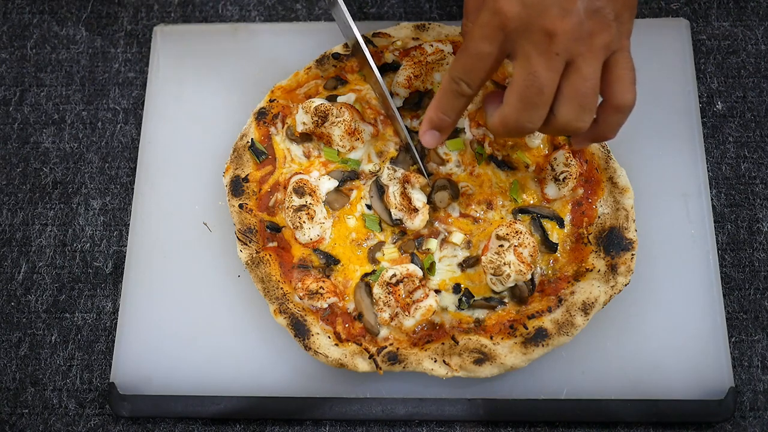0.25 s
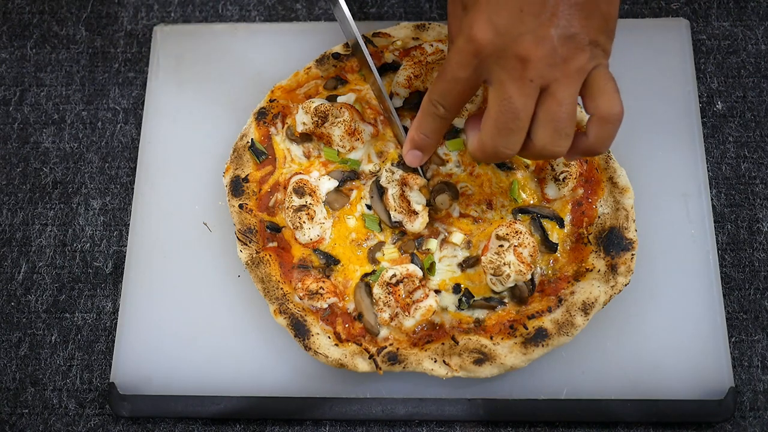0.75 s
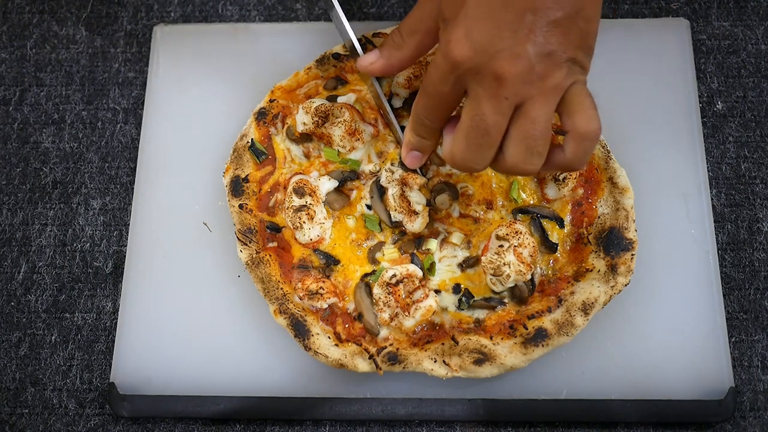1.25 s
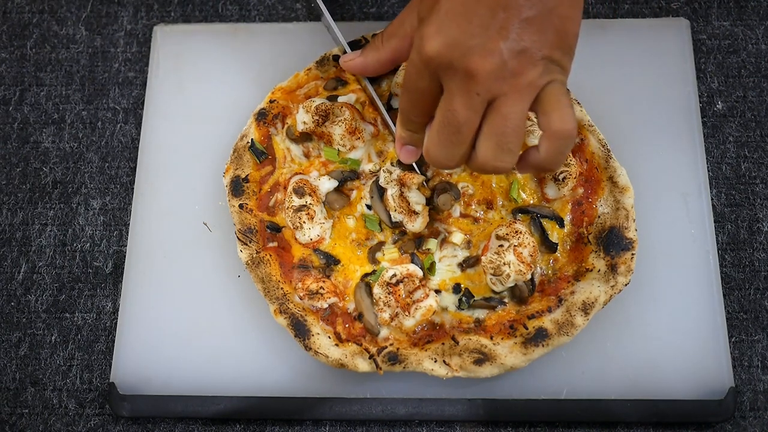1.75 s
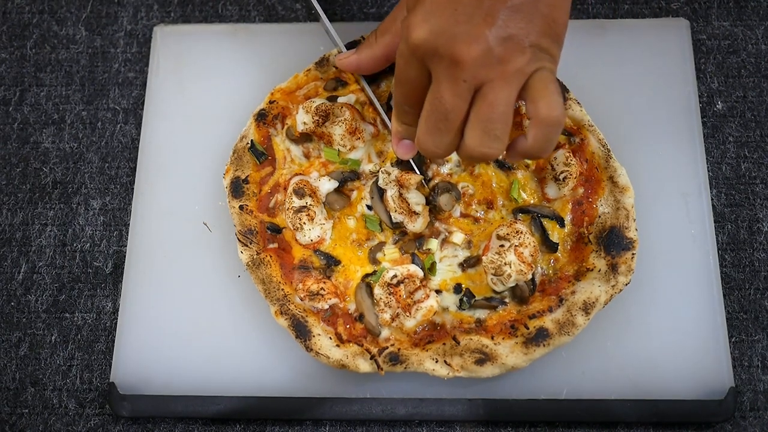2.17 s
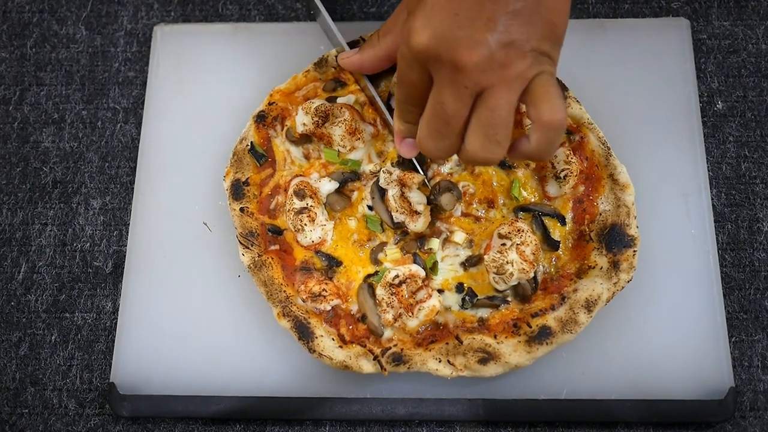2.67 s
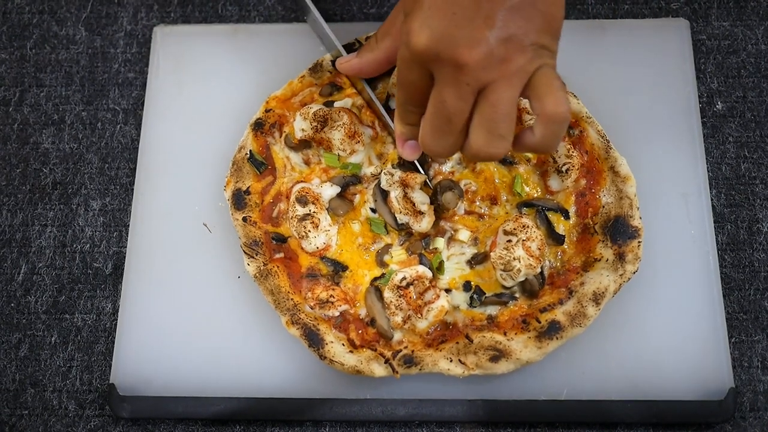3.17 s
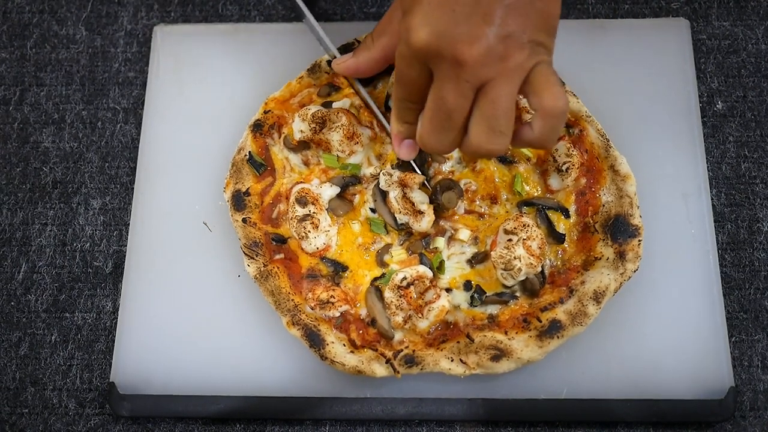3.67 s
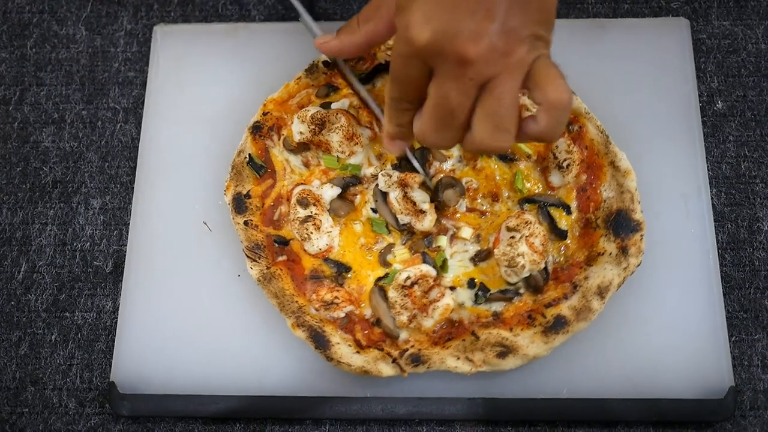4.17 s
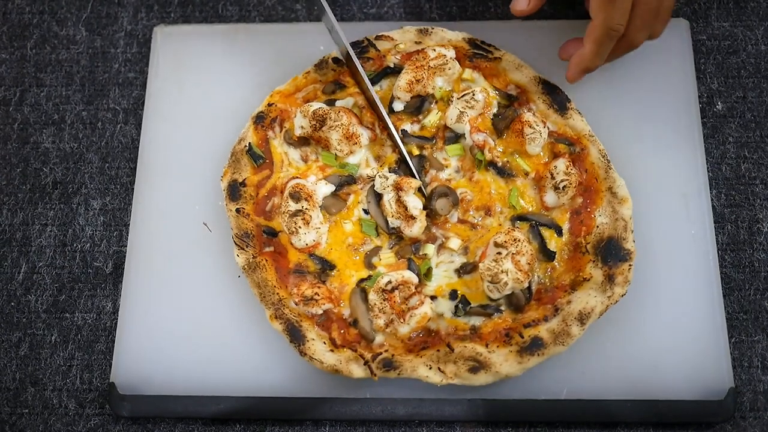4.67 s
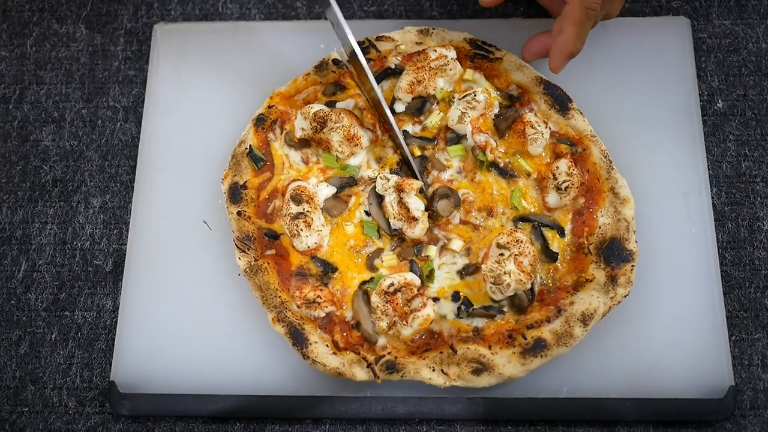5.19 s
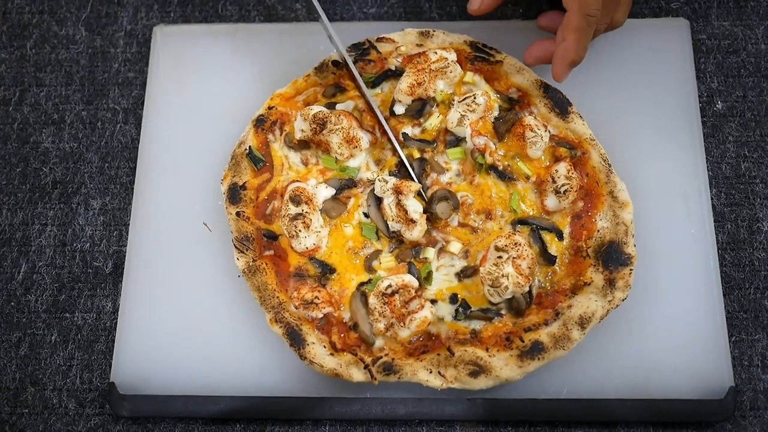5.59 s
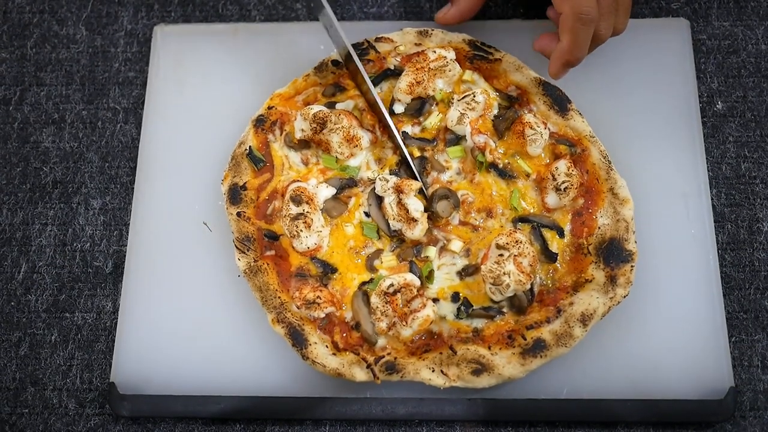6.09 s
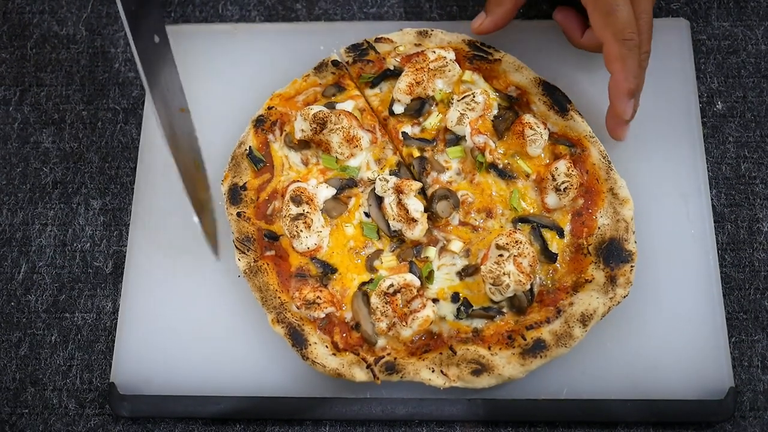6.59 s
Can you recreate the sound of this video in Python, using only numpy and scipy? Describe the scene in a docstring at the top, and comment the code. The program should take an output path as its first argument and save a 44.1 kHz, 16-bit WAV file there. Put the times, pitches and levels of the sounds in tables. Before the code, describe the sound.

A knife cuts through crisp pizza crust in irregular crunches and crackles, with a few knocks on a plastic cutting board.

```python
"""In a small, quiet kitchen, a knife saws through a crisp baked crust on a plastic board.
The crust breaks in sharp cracks over a dense crackle; each break is a brief, bright snap of crust with
a short thud of the board. The blade knocks on the bare board and is set down at the end with a faint
ting. The pushing hands shake the table, which rumbles up into a close stereo microphone."""
import sys
import numpy as np
from scipy import signal
from scipy.fft import rfft, irfft
from scipy.io import wavfile
from scipy.ndimage import uniform_filter1d

SR = 44100
rng = np.random.default_rng(int(sys.argv[2]) if len(sys.argv) > 2 else 0)


def log_audio(samples):
    """Write samples as a 16-bit WAV file to the path given in sys.argv[1]."""
    # one column per channel
    frames = np.atleast_2d(samples).T
    # limit to full scale, then quantise
    limited = np.clip(frames, -1, 1)
    pcm = np.round(limited * 32767).astype(np.int16)
    wavfile.write(sys.argv[1], SR, pcm)


N = 301775

# Room air, and the hiss that differs between left and right. Each row: frequency in Hz, relative dB.
AIR_COLOUR = [(15, 12.5), (45, -4.5), (60, 0), (170, -1.5), (300, -3.5), (1200, -11), (2200, -19),
              (4400, -19), (6000, -21.5), (11000, -23.5), (16000, -29.5)]
HISS_COLOUR = [(15, -20.5), (300, -20), (1000, -29.5), (5000, -30), (16000, -33.5)]

# A mode is a pitch at which a thing likes to ring. The table sways, rocks and drums in these modes.
# Each row: pitch in Hz, width in Hz, relative level in dB.
SWAY_MODES = [(17, 10, 0)]
ROCK_MODES = [(43, 11, 0), (53, 7, -16)]
DRUM_MODES = [(83, 12, -3), (96, 12, -7), (112, 14, -9), (180, 70, -11)]
# Hands shove the table. Each row: peak time and hold in seconds, then sway, rock and drum levels in dB.
HAND_SHOVES = [(0.87, 0.018, -56, -66, -76), (1.107, 0.07, -48.5, -51, -61),
               (1.31, 0.044, -46.5, -60, -58.5), (1.695, 0.36, -55, -61.5, -58),
               (2.008, 0.034, -41.5, -60, -51.5), (2.157, 0.041, -50.5, -65, -54),
               (2.415, 0.14, -43, -50, -60), (2.64, .01, -63, -65, -50.5), (2.75, 0.075, -42, -89, -59),
               (3.096, 0.22, -40.5, -40, -40.5), (3.562, 0.16, -38.5, -44.5, -44.5),
               (3.956, 0.078, -51, -46, -47.5), (4.126, 0.039, -30.5, -33, -41),
               (4.398, 0.13, -41, -35, -37), (4.618, 0.13, -40, -47, -42),
               (5.042, 0.049, -36.5, -41, -45.5), (5.243, 0.044, -35.5, -51, -54),
               (5.407, 0.028, -35.5, -44.5, -53.5), (5.5, 0.014, -40.5, -45.5, -42.5),
               (5.666, 0.015, -41.5, -41, -48), (5.913, 0.11, -38, -49.5, -53),
               (6.134, 0.081, -45.5, -58, -58), (6.745, .1, -54, -52, -45.5)]

# Modes of struck things. Each row: pitch in Hz, relative level in dB, seconds to fade by 60 dB.
BOARD_MODES = [(431, -16, .04), (625, -4, .048), (790, 0, .022), (960, -3, .026), (1130, -4, .022)]
CRUST_MODES = [(1250, 7, 0.0015), (2048, -4, 0.0075), (2640, 3.5, 0.0037), (3050, -1, 0.0028),
               (3390, -2.5, 0.0025)]
EDGE_MODES = [(4250, 0, .005), (4800, 0, .005), (5450, -2, .005), (6100, -9, .004), (7400, -16, .004)]  # the bright part of a break
SPLINTER_MODES = [(8650, 6, 0.0012), (10000, -5, 0.005), (11380, -7.5, 0.0025), (14220, -12, 0.0012)]  # the finest bits under the edge
STEEL_MODES = [(3930, 0, .05), (4050, -8, .03)]
THUMP_MODES = [(104.4, -3.5, 0.43), (158, -2.5, 0.13), (302, -4, 0.049)]  # low ring under the knife as it is set down

# The knife is set down, and its lifted blade touches the board. Each row: time in seconds, level in dB.
KNIFE_LANDINGS = [(6.711, -27.5), (6.823, -27.5)]
BLADE_TOUCHES = [(6.71, -42.5), (6.786, -55), (6.821, -49)]
# The blade hits the bare board. Each row: start in seconds, strength in dB, contact time in seconds.
BOARD_KNOCKS = [(3.2178, -12.5, 0.00078), (4.9995, 3, 0.00071), (6.818, -12, 0.00079)]
# Each bite of the blade is a burst of crackle. Each row: peak time and hold in seconds,
# rise and fade in dB per second, then crust, board and edge levels in dB.
BLADE_BITES = [(1.288, .012, 898, 185, -60.5, -55, -57.5), (1.724, .02, 400, 83, -57.5, -60, -56.5),
               (1.9, .02, 1200, 316, -54.5, -55.5, -52.5), (1.937, .015, 800, 222, -48, -48, -45),
               (2.101, .01, 1200, 174, -57, -57, -53), (2.429, .074, 496, 130, -52, -58, -53.5),
               (2.6, .01, 1200, 108, -54, -54, -54.5), (2.748, .07, 500, 192, -57, -55.5, -58.5),
               (2.923, .031, 600, 250, -58, -59, -63.5), (3.014, .03, 1200, 320, -44.5, -43.5, -47),
               (3.093, .044, 550, 300, -48.5, -66, -54.5), (3.156, .01, 1500, 350, -36.5, -36, -39.5),
               (3.236, .034, 550, 144, -42.5, -55, -45), (3.466, .015, 1500, 196, -41, -48, -46),
               (3.557, .025, 550, 270, -47.5, -54, -54), (3.641, .015, 1500, 155, -45.5, -59, -46),
               (3.768, 0.025, 300, 150, -58, -59.5, -60.5), (3.906, .08, 1800, 239, -50, -52, -54),
               (4.071, .024, 503, 302, -38.5, -42.5, -46), (4.135, 0.0091, 1200, 250, -56.5, -52.5, -52.5),
               (4.194, .03, 2000, 129, -41, -48, -50), (4.382, .025, 598, 258, -34.5, -37.5, -42.5),
               (4.471, .021, 450, 550, -33.5, -38, -42.5), (4.55, .023, 400, 507, -37.5, -42.5, -47),
               (4.61, .02, 900, 220, -38.5, -44, -46.5), (4.681, .04, 800, 102, -47, -46.5, -49.5),
               (4.909, .005, 1500, 110, -57, -73, -56), (4.995, .068, 1205, 102, -54, -51, -62),
               (5.105, .034, 548, 331.5, -49, -52, -59.5), (5.252, .03, 2000, 95, -47, -58, -48.5),
               (5.46, .006, 1502, 163, -64, -59, -56), (5.619, .0087, 598, 103, -54, -59, -61.5),
               (5.754, .039, 803, 152, -60, -63.5, -60.5), (6.109, .022, 1195, 302, -52, -56, -66),
               (6.163, 0.05, 549, 142.5, -63.5, -62.5, -70), (6.71, .0046, 1501.5, 42, -67, -60.5, -69),
               (6.816, .03, 548, 100, -55, -64, -70)]
# The blade resting in the crust creaks faintly. One long burst, with the same columns as a bite.
RESTING_CREAK = (0.5, 6, 302, 59.5, -70, -74, -76)
# Single sharp cracks. Each row: time in seconds, then crust, board and edge strengths in dB.
CRUST_CRACKS = [(0.7841, -41, -39, -62), (.899, -49, -54, -62), (1.1443, -24, -32, -30.5),
                (1.2014, -22.5, -34, -36.5), (1.28, -31, -44, -52), (1.293, -16, -26.5, -28.5),
                (1.3097, -28, -37, -34), (1.3204, -27.5, -61, -37), (1.3596, -32, -30, -45),
                (1.3636, -37, -50, -45), (1.4728, -49, -45.5, -46), (1.521, -48, -50, -46),
                (1.5575, -33, -37.5, -38), (1.6, -41, -42, -42), (1.638, -39, -35.5, -40),
                (1.6794, -36, -54, -40), (1.69, -38, -33, -52), (1.7249, -38, -39, -52),
                (1.737, -37, -44, -43), (1.7476, -35, -38, -53), (1.7592, -27, -38, -31),
                (1.779, -34, -53, -51), (1.824, -37, -43, -50), (1.876, -43, -45, -52),
                (1.888, -38, -39, -46), (1.9012, -24.5, -43, -35), (1.9211, -26, -34, -22),
                (1.9395, -19.5, -16.5, -25), (1.952, -30, -46, -43), (2.007, -26, -27.5, -53),
                (2.1026, -31, -38, -33), (2.1163, -23, -25, -27.5), (2.152, -28.5, -41, -36),
                (2.2759, -37, -41, -44.5), (2.3396, -35.5, -35, -40), (2.3832, -38, -49, -53),
                (2.431, -39, -36, -49), (2.4611, -19.5, -33, -39), (2.4932, -20.5, -32, -38),
                (2.5205, -30, -59, -49), (2.591, -27, -32, -42), (2.609, -36, -37, -43),
                (2.6402, -34, -40, -34), (2.671, -36, -35, -46), (2.7176, -54, -32, -65),
                (2.74, -48, -31.5, -55), (2.752, -37, -35, -43), (2.775, -31, -32.5, -46),
                (2.788, -38, -36, -48), (3.0208, -25, -38, -32), (3.03, -22.5, -32, -40),
                (3.036, -23, -29, -39), (3.043, -21, -25.5, -45), (3.0525, -22, -27, -45),
                (3.078, -27, -46, -44), (3.0933, -11, -21.5, -35), (3.105, -30, -34, -42),
                (3.117, -40, -29, -42), (3.1253, -29, -25, -40), (3.1322, -25, -26, -27),
                (3.1537, -23, -13.5, -27.5), (3.171, -23, -18, -26), (3.185, -24, -25, -26),
                (3.2183, -20, -14, -26), (3.2508, -21, -16.5, -24), (3.2595, -16.5, -14.5, -16),
                (3.2725, -31, -33, -28), (3.442, -38, -39, -58), (3.457, -38, -44, -47),
                (3.465, -14.5, -34, -26), (3.482, -28, -26, -39), (3.4947, -9.5, -21.5, -19),
                (3.5173, -24, -54, -29), (3.533, -28, -52, -37), (3.55, -29, -40, -44),
                (3.5609, -21, -60, -50), (3.589, -42, -36, -47), (3.656, -15.5, -19, -14),
                (4.1946, -27, -34, -32), (4.2614, -19.5, -25.5, -54), (4.34, -27.5, -35, -46),
                (4.3784, -17, -35, -43), (4.4089, -14, -22, -35), (4.5692, -20, -27, -45),
                (4.6766, -16.5, -23.5, -35), (4.7206, -18, -49, -44), (4.726, -20, -49, -43),
                (4.7314, -19, -37, -20), (4.738, -19, -34, -25), (4.75, -23, -26, -29),
                (4.7597, -9.5, -12, -14.5), (4.789, -27, -32, -36), (4.8012, -23, -35, -32),
                (4.884, -30, -40, -39), (4.9142, -10, -19, -17), (4.9995, -5, 0, -23),
                (5.135, -29, -60, -47), (5.2464, -8, -22.5, -11), (5.2675, -14, -22.5, -19),
                (5.299, -30, -27.5, -39), (5.3972, -33, -34.5, -44), (5.467, -29.5, -30, -35),
                (5.613, -30, -45, -40), (5.632, -27.5, -32, -68), (5.6583, -30, -59, -52),
                (5.724, -36, -60, -46), (5.806, -37.5, -58, -43.5), (5.864, -57, -35, -56.5),
                (5.967, -31, -74, -39), (6.47, -42, -40.5, -55.5), (6.71, -36, -26, -43)]

CRACK_SCATTER_DB, THUD_SCATTER_DB, CRUMB_SCATTER_DB = 2.8, 2.2, 5.5  # mode levels vary from hit to hit
DOUGH_DAMP, KNOCK_DAMP = .35, .68  # share of the board's ring time left under the dough, under the blade
PIECE_DETUNE = .1  # pitches spread because every piece of crust has its own size


def undb(db):
    """Turn decibels into a gain."""
    return 10 ** (np.asarray(db) / 20)


def unit(x):
    """Scale a signal to an average (rms) level of 1."""
    return x / np.sqrt(np.mean(x ** 2))


def wander(per_s):
    """A smooth random curve that heads for a new value per_s times a second."""
    step = int(SR / per_s)
    stairs = np.repeat(rng.standard_normal(N // step + 1), step)
    return uniform_filter1d(uniform_filter1d(stairs, step), step)[:N]


def bursts(peak_s, hold_s, rise, fade, db):
    """Total level in dB of bursts that rise, hold and fade; rise and fade are in dB per second."""
    t = np.arange(0, N / SR + .002, .001)[:, None]
    below_peak = rise * np.maximum(peak_s - t, 0) + fade * np.maximum(t - peak_s - np.abs(hold_s), 0)
    power = np.sum(undb(2 * np.maximum(db - below_peak, -150)), axis=1)
    return np.interp(np.arange(N) / SR, t[:, 0], 10 * np.log10(power))


def ring(force, hz, ring_s):
    """One mode rings and dies away; only its motion makes sound, so it is silent at rest."""
    turn = np.exp(2j * np.pi * hz / SR)
    pole = turn * np.exp(-np.log(1000) / (max(ring_s, 1e-3) * SR))
    motion = np.array([1, -1]) * pole.imag / abs(1 - turn)
    return signal.lfilter(motion, [1, -2 * pole.real, abs(pole) ** 2], force)


def strike(where, size, modes, scatter_db, crumbling=False, damp=1, detune=0):
    """Hits at the samples in `where` ring the modes; each lands on a new spot and mixes them anew."""
    luck = rng.standard_normal((len(where), 3, len(modes)))
    sound = 0
    for k, (hz, db, ring_s) in enumerate(modes):
        weight = undb(db) * size * undb(scatter_db * luck[:, 0, k])
        if crumbling:  # neighbouring modes start opposed, and the tone drifts as the blade moves on
            weight = (-1) ** k * weight * undb(3.5 * wander(per_s=14)[where])
        if detune:
            age = np.arange(int(max(damp * ring_s, 1e-3) * SR))
            pitch = hz * np.exp(detune * luck[:, 1, k, None])
            phase = 2 * np.pi * pitch * age / SR + .9 * luck[:, 2, k, None]
            pings = weight[:, None] * np.exp(-np.log(1000) * age / len(age)) * np.cos(phase)
            sound += np.bincount((where[:, None] + age).ravel(), pings.ravel(), N)[:N]
        else:
            sound += ring(np.bincount(where, weight, N)[:N], hz, damp * ring_s)
    # a small thing gives off little below its first mode, a soft hit little above its last
    band_hz = [.7 * modes[0][0], min(1.25 * modes[-1][0], .45 * SR)]
    sound = signal.sosfilt(signal.butter(3, band_hz, "band", fs=SR, output="sos"), sound)
    return sound / sum(undb(db) for _, db, _ in modes)


def steady_noise(colour):
    """Room air or microphone hiss: even noise, shaped to the given colour."""
    hz, db = np.transpose(colour)
    bins_hz = np.arange(1, N // 2 + 2) * SR / N
    shape = undb(np.interp(np.log(bins_hz), np.log(hz), db))
    return irfft(rfft(rng.standard_normal(N)) * shape, N)


def room_echo(sound, ring_s=.3, dull_hz=5030):
    """Nearby surfaces send back dense, dull echoes that fade quickly."""
    t = np.arange(int(.5 * SR)) / SR
    tail = rng.standard_normal(len(t)) * np.exp(-np.log(1000) * t / ring_s) * (t > .004)
    tail = signal.lfilter(*signal.butter(1, dull_hz, fs=SR), tail)
    return signal.fftconvolve(sound, tail / np.sqrt(np.sum(tail ** 2)))[:N]


def table_rumble():
    """Uneven pressure from the hands drives the low modes of the table."""
    peak_s, hold_s, sway_db, rock_db, drum_db = np.transpose(HAND_SHOVES)
    rumble = 0
    for modes, shove_db, fade, rest_db in ((SWAY_MODES, sway_db, 67.5, -65.5),
                                           (ROCK_MODES, rock_db, 104.5, -73),
                                           (DRUM_MODES, drum_db, 104.5, -71.5)):
        shoves = undb(bursts(peak_s, hold_s, rise=188, fade=fade, db=shove_db))
        force = np.hypot(shoves, undb(rest_db))
        push = rng.standard_normal(N)
        for hz, width_hz, db in modes:
            ring_s = np.log(1000) / (np.pi * width_hz)
            shake = ring(ring(push, hz, ring_s), hz, ring_s)  # a top on legs: two ringing stages
            rumble += unit(shake) * force * undb(db)
    return rumble


def blade_ting():
    """The lifted blade touches the board and its steel rings faintly."""
    time_s, db = np.transpose(BLADE_TOUCHES)
    return strike((time_s * SR).astype(int), undb(db), STEEL_MODES, THUD_SCATTER_DB)


def knife_thumps():
    """The knife is set down on the board with dull thumps."""
    time_s, db = np.transpose(KNIFE_LANDINGS)
    return strike((time_s * SR).astype(int), undb(db), THUMP_MODES, THUD_SCATTER_DB)


def board_knocks():
    """The blade gives the bare board a short, rounded push that makes it ring hollow."""
    t = np.arange(N) / SR
    push = 0
    for start_s, db, contact_s in BOARD_KNOCKS:
        progress = np.clip((t - start_s) / contact_s, 0, 1)
        push += undb(db) * np.sin(np.pi * progress) ** 2 / (contact_s * SR)
    # hit near its middle, the board favours its main mode: the others lie 1.5 times as many dB down
    return sum(undb(1.5 * db) * ring(push, hz, KNOCK_DAMP * ring_s) for hz, db, ring_s in BOARD_MODES)


def splinter_level(edge_db, crust_db, growth):
    """Level in dB of the finest splinters: the brighter the break, the more of them."""
    return edge_db - 8.5 + growth * (edge_db - crust_db)


def crust_crackle(breaks_per_s=2800):
    """A swarm of tiny breaks, mostly faint, a few strong, comes in clumps as the blade slips."""
    chance = rng.random((int(breaks_per_s * N / SR), 3))
    where = (chance[:, 0] * N).astype(int)
    clumps_db = 2.06 * wander(per_s=150)
    size_db = -1.44 * np.log(1 - chance[:, 2]) + clumps_db[where]
    size = np.sign(chance[:, 1] - .5) * undb(size_db)
    peak_s, hold_s, rise, fade, *levels = np.transpose(BLADE_BITES + [RESTING_CREAK])
    crust_db, board_db, edge_db = (bursts(peak_s, hold_s, np.abs(rise), fade, db) for db in levels)
    splinter_db = splinter_level(edge_db, crust_db, growth=1.3)
    crackle = 0
    for modes, db, damp, detune in ((CRUST_MODES, crust_db, 1, PIECE_DETUNE),
                                    (BOARD_MODES, board_db, DOUGH_DAMP, 0),
                                    (EDGE_MODES, edge_db, 1, PIECE_DETUNE),
                                    (SPLINTER_MODES, splinter_db, 1, PIECE_DETUNE)):
        swarm = strike(where, size, modes, CRUMB_SCATTER_DB, crumbling=True, damp=damp, detune=detune)
        crackle += unit(swarm) * undb(db)
    return crackle


def crust_cracks():
    """Each crack is four breaks within a few milliseconds: the main one, two after, a small one before."""
    time_s, crust_db, board_db, edge_db = np.transpose(CRUST_CRACKS)
    chance = rng.random((len(time_s), 6))
    delay_s = np.c_[np.zeros_like(time_s), [.0003, .001, -.001] + [.0008, .002, -.003] * chance[:, :3]]
    share = np.c_[np.ones_like(time_s), [-.8, .6, -.18] * chance[:, 3:]]
    where = ((time_s[:, None] - .0004 + delay_s) * SR).astype(int)
    # only the main break thuds on the board
    cracks = strike(where[:, 0], undb(board_db + 1.5), BOARD_MODES, THUD_SCATTER_DB,
                    damp=DOUGH_DAMP, detune=PIECE_DETUNE)
    splinter_db = splinter_level(edge_db, crust_db, growth=.74)
    for modes, db in ((CRUST_MODES, crust_db + 3), (EDGE_MODES, edge_db + 1.5),
                      (SPLINTER_MODES, splinter_db - .5)):
        size = share * undb(db)[:, None]
        cracks -= strike(where.ravel(), size.ravel(), modes, CRACK_SCATTER_DB, detune=PIECE_DETUNE)
    return cracks


def scene():
    """The cut sits in the centre; echoes, top treble, hiss and a trace of rumble differ left and right."""
    cut = crust_cracks() + crust_crackle() + board_knocks() + blade_ting()
    shake = table_rumble() + knife_thumps()
    air, hiss = steady_noise(AIR_COLOUR), steady_noise(HISS_COLOUR)
    noise_gain = undb(-60.5) / np.std(air)
    centre = cut + undb(-18) * room_echo(cut) + shake + noise_gain * air
    # a faint, slightly delayed copy of the top treble sets left and right apart
    late_cut = np.roll(cut, int(.0008 * SR))
    treble = signal.sosfilt(signal.butter(2, 7000, "high", fs=SR, output="sos"), late_cut)
    side = undb(-34) * room_echo(cut) + undb(-12.5) * treble + noise_gain * hiss + undb(-45) * shake
    return np.array([centre + side, centre - side])


def record(dry):
    """The recorder drops the deepest sway and cuts the highest treble."""
    low_cut = signal.butter(1, 9, "high", fs=SR, output="sos")
    top_cut = signal.ellip(10, .2, 80, 16000, fs=SR, output="sos")
    return signal.sosfilt(np.r_[low_cut, top_cut], dry)


dry = scene()
out = record(dry)
log_audio(out)
```